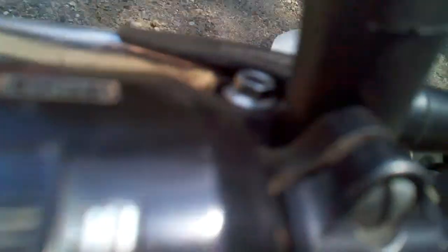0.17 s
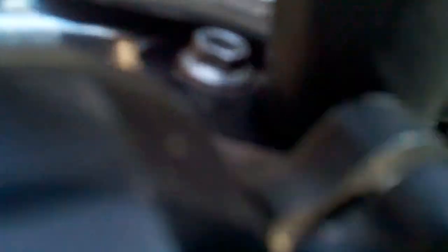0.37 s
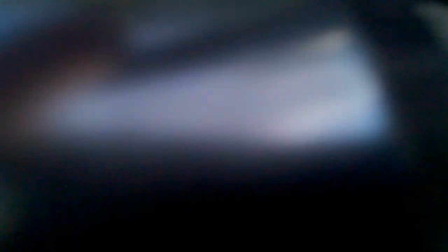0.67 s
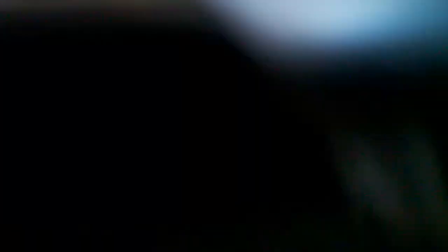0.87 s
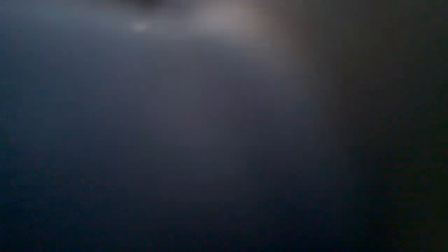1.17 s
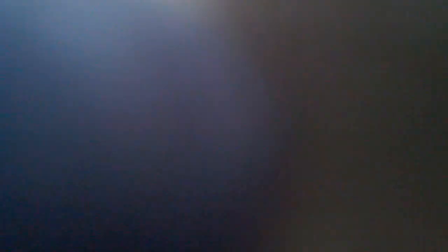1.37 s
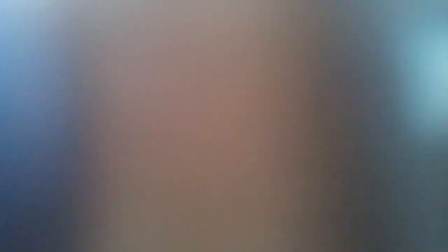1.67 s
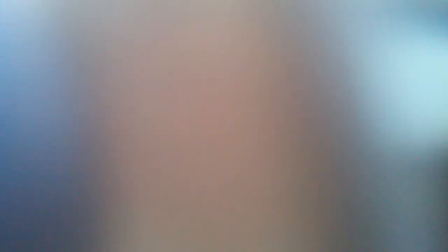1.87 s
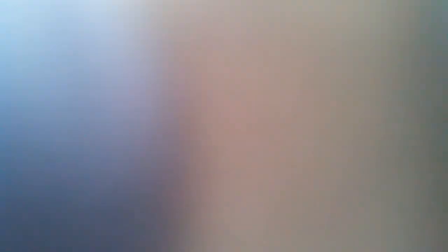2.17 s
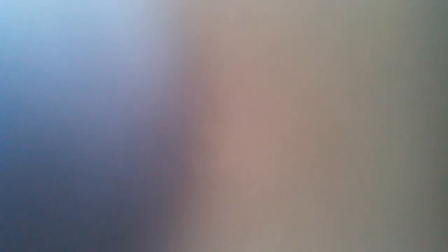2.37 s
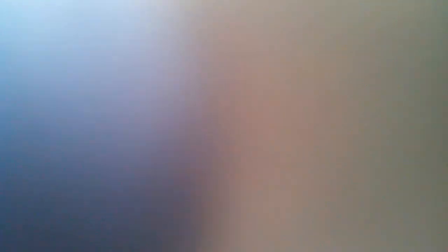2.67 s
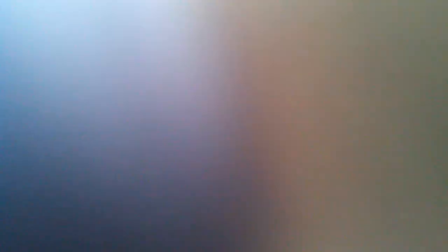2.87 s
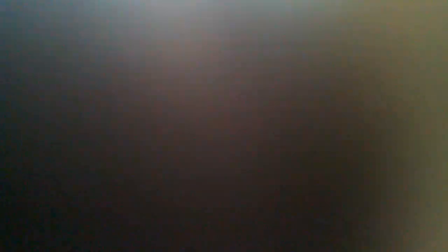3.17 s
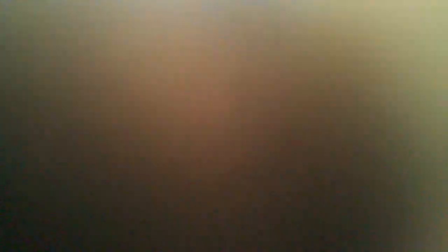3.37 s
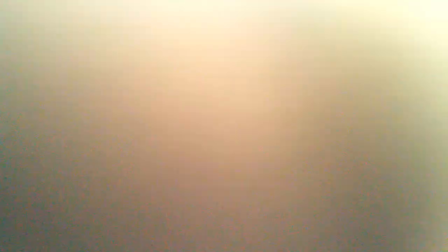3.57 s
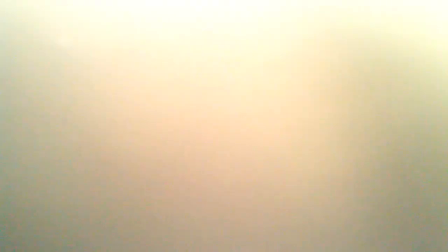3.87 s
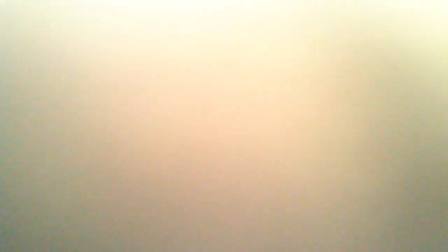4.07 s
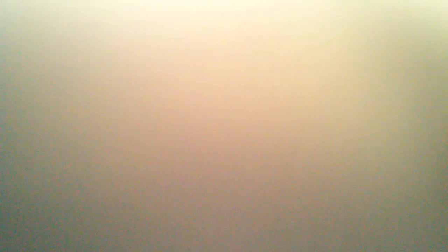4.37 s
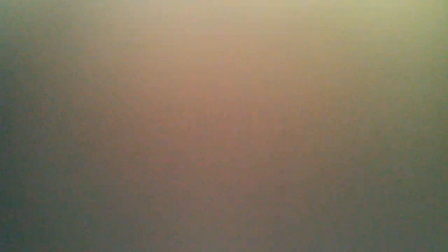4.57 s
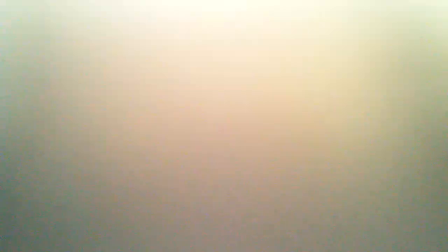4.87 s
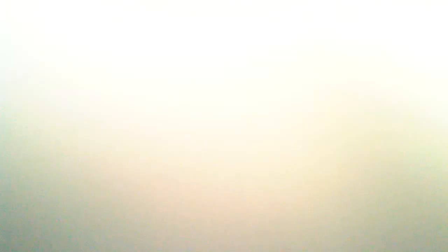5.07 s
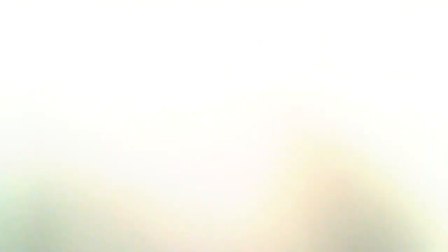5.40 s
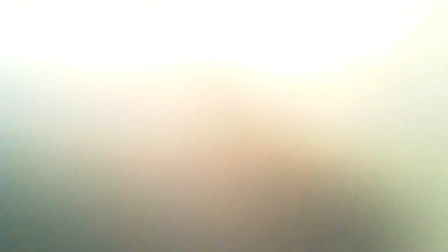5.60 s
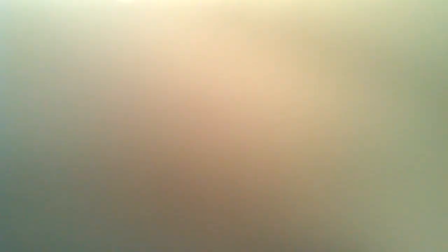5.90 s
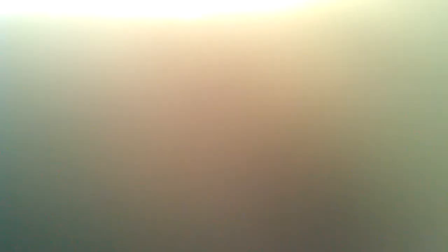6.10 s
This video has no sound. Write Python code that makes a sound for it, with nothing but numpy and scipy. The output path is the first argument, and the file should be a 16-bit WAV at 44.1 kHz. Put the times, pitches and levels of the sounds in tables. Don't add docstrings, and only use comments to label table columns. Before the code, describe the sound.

A small two-stroke motorbike idles lumpily with uneven pops and ticking, blips its throttle, stutters into a pull-away, then runs steadily as wind rises.

```python
import sys
import numpy as np
from scipy import signal
from scipy.fft import rfft, irfft
from scipy.io import wavfile

SR = 44100
rng = np.random.default_rng(int(sys.argv[2]) if len(sys.argv) > 2 else 0)


def file_out(sig):
    cols = np.atleast_2d(sig).T
    lim = np.clip(cols, -1, 1)
    pcm = np.round(lim * 32767).astype(np.int16)
    wavfile.write(sys.argv[1], SR, pcm)


def volts_from_db(level):
    exponent = np.asarray(level, float) / 20
    return 10 ** exponent


N = 275184


def rms_one(x):
    return x / np.sqrt(np.mean(x ** 2) + 1e-20)


def in_time(rows, s=None):
    t, *columns = np.transpose(rows)
    when = np.arange(N) / SR if s is None else s
    return [np.interp(when, t, c) for c in columns]


def clicks(s, size):
    at = np.round(np.asarray(s) * SR).astype(int)
    inside = (at >= 0) & (at < N)
    return np.bincount(at[inside], np.asarray(size)[inside], N) + 1e-18


def resonate(x, hz, width_hz):
    r = np.exp(-np.pi * width_hz / SR)
    poles = [1, -2 * r * np.cos(2 * np.pi * hz / SR), r * r]
    return signal.lfilter(np.array([1, 0, -1]) * (1 - r * r) / 2, poles, x)


def resonate_twice(x, hz, width_hz):
    return resonate(resonate(x, hz, width_hz), hz, width_hz)


def ring(x, modes):
    return sum((-1) ** k * volts_from_db(db) * resonate(x, hz, w) for k, (hz, w, db) in enumerate(modes))


def butter(x, order, hz, kind="low"):
    return signal.sosfilt(signal.butter(order, hz, kind, fs=SR, output="sos"), x)


def smear(x, seconds):
    r = np.exp(-1 / (seconds * SR))
    return signal.lfilter([np.e / (seconds * SR)], [1, -2 * r, r * r], x)


def drift(rate_hz):
    return rms_one(smear(rng.standard_normal(N + SR), 1 / (2 * np.pi * rate_hz))[SR:])


def colour(x, spectrum):
    hz, level_db = np.transpose(spectrum)
    f = np.fft.rfftfreq(N, 1 / SR) + 1
    gain = volts_from_db(np.interp(np.log(f), np.log(hz), level_db))
    return rms_one(irfft(rfft(x) * gain, N))


# t/s, blast/dB, hiss/dB
THROTTLE_FIRINGS = [(2.7598, -1, -26.5), (2.8127, -1, -28.5), (2.8389, -2, -30), (2.856, -1, -30),
                    (2.872, -3, -35), (3.4386, 3.5, -56), (3.4903, 4.5, -20.5), (3.5851, 3.5, -18.5),
                    (3.652, 2.5, -21), (3.7112, 1.5, -27), (3.7499, 3.5, -23), (3.791, -0.5, -42),
                    (3.832, 3.5, -24.5), (3.8723, 3, -22), (3.914, -0.5, -31.5), (3.9602, 3, -22.5),
                    (4.005, 3, -25.5), (4.0559, 1.5, -27), (4.1044, 2.5, -27), (4.1538, 1.5, -29),
                    (4.201, 2.5, -26)]
# t/s, blast/dB
IDLE_FIRINGS = [(-0.0064, 6.5), (0.1444, -11.5), (0.2241, -6.5), (0.3442, -11), (0.4289, -5.5),
                (0.508, -14.5), (0.5975, -3.5), (0.753, -9.5), (0.839, -4), (0.962, -18), (1.0069, -2),
                (1.252, -2), (1.4515, -6), (1.6415, -4), (1.8001, -2.5), (1.947, -7), (2.0285, -11),
                (2.1047, -5.5), (2.186, -13), (2.2716, -4.5), (2.309, -17), (2.4086, -3), (2.636, -3.5),
                (2.73, -12.5)]


def firings():
    lead_s, spurt_db, spurt_per_blast_db = .0015, -24.5, 3.5
    idle = [(s - lead_s, db, spurt_db + spurt_per_blast_db * db) for s, db in IDLE_FIRINGS]
    return np.transpose([*idle, *THROTTLE_FIRINGS])


# t/s, turns per s
CRANK_SPEED = [(0, 26), (.98, 24), (1.05, 29), (1.4, 30), (1.6, 26), (2.58, 22), (2.7, 31), (2.86, 55),
               (2.93, 56), (3.12, 49), (3.35, 41.5), (3.43, 39.5), (4.26, 41.64), (4.38, 44.16),
               (4.6, 44.77), (4.7, 42.98), (5.75, 44.55), (5.9, 43.56), (5.98, 40.98), (6.1, 42.88)]


def overspeed():
    idle_turns_per_s, cruise_db = 25, 4
    speed_db = 20 * np.log10(in_time(CRANK_SPEED)[0] / idle_turns_per_s)
    return speed_db, np.maximum(speed_db - cruise_db, 0)


# t/s, ordinary puff/dB, pipe heat/0-1
ENGINE_LOAD = [
    (0, -21, 0.43),
    (2.68, -20.5, 0.33),
    (2.82, -14, 0.52),
    (2.92, -11.5, 0.62),
    (3.36, -11, 0.75),
    (3.46, -9, 0.41),
    (4.2, -11.5, 0.67),
    (4.27, -2, 0.72),
    (6.24, -3, 0.84),
]


def turns():
    fire_s, blast_db, _ = firings()
    s = np.arange(N) / SR
    angle = np.cumsum(in_time(CRANK_SPEED)[0]) / SR
    at_fire = np.interp(fire_s, s, angle)
    fired = np.r_[0, np.cumsum(np.maximum(np.round(np.diff(at_fire)), 1))].astype(int)
    rest = int(angle[-1] - at_fire[-1])
    count = [*fired, fired[-1] + rest]
    turn_angle = np.interp(np.arange(count[-1] + 1), count, [*at_fire, at_fire[-1] + rest])
    at = np.interp(turn_angle, angle, s)
    puff_db, heat = in_time(ENGINE_LOAD, at)
    cold_uneven_db, hot_uneven_db = 2, .75
    uneven_db = cold_uneven_db + (hot_uneven_db - cold_uneven_db) * heat
    uneven_db = uneven_db * (1 - .8 * in_time(OVERRUN, at)[0])
    wobble = uneven_db[:, None] * rng.standard_normal((len(at), 2))
    level_db = puff_db + wobble[:, 0]
    at = at + .00013 * wobble[:, 1]
    at[fired], level_db[fired] = fire_s, blast_db
    return at, level_db, heat


# f/Hz, width/Hz, level/dB
COOL_PIPE = [(306.9, 35.9, 11), (397, 51.4, 6), (271.6, 2, -4.5), (140, 500, -18.5), (663, 54.5, -2)]
# f/Hz, width/Hz, level/dB
HOT_PIPE = [(147.6, 89, -14), (209.5, 89, -12.5), (378, 48.1, 3), (480, 36, -4), (594, 920, -19.5),
            (551, 36, -16), (308.5, 26, -1)]


def silencer(at, size, heat, ratio):
    echo_s, echo_share = 0.00679, 0.57
    cut_s, cut_share = 0.01271, 0.14
    swell_s, swell_share = 0.00289, 0.33
    cool, hot = (1 - heat) * size, heat * size
    cool_puffs = clicks(at, cool) + clicks(at + echo_s / ratio, echo_share * cool)
    cool_puffs = cool_puffs - clicks(at + cut_s / ratio, cut_share * cool)
    hot_puffs = clicks(at + 0.001882 / ratio, hot) + clicks(at + (0.0016 - swell_s) / ratio, swell_share * hot)
    stretch = np.array([ratio, ratio, 1])
    return ring(cool_puffs, COOL_PIPE * stretch) + volts_from_db(4.0) * ring(hot_puffs, HOT_PIPE * stretch)


# t/s, share/0-1
OVERRUN = [
    (2.87, 0),
    (2.9, 0.7),
    (3.14, 0.68),
    (3.3, 0.65),
    (3.42, 0.49),
    (3.5, 0.13),
    (4.2, 0.15),
    (4.3, 0.35),
    (4.8, 0),
    (6.24, 0.02),
]


def exhaust(at, level_db, heat):
    soft = in_time(OVERRUN, at)[0]
    breath_lag_s, breath_db, pull_away_s = 0.0019, 9.5, 3.4
    breaths = clicks(at + breath_lag_s, soft * volts_from_db(level_db + breath_db))
    level_db = level_db + 20 * np.log10(1.001 - soft)
    hard = np.isin(at, np.transpose(THROTTLE_FIRINGS)[0]) & (at > pull_away_s)
    sucks = clicks(at + 0.019, (1 - heat) * volts_from_db(-28.0 + rng.normal(0, 6.5, len(at))))
    modes = silencer(at, ~hard * volts_from_db(level_db), heat, 0.98) + ring(sucks, COOL_PIPE)
    warm_db, warm_heat, warm_ratio = -1.5, 0.39, 1.069
    warm = silencer(at, hard * volts_from_db(level_db + warm_db), warm_heat, warm_ratio)
    modes = modes + warm - 0.87 * resonate(warm, 491, 108)
    modes = modes + resonate_twice(breaths, 340, 73)
    modes = modes + ring(breaths, [(192, 450, -23), (430, 24, -13), (600, 49, -26), (231, 38, -14)])
    modes = butter(modes, 4, [124, 560], "band")
    crankcase_beat = volts_from_db(15) * resonate_twice(breaths, 113.4, 38.5)
    return crankcase_beat - volts_from_db(41.5) * butter(modes, 4, 950)


# f/Hz, width/Hz, level/dB
RASP_MODES = [(640, 40, -3), (1054, 27, -32), (1246, 82, 6.5), (1860, 130, -22), (2200, 160, 7)]


def rasp(at, level_db, heat):
    rasp_db, shut_share, shut_turns = -6.5, 0.57, 0.44
    size = heat ** 2 * volts_from_db(rasp_db + .6 * level_db + rng.normal(0, 1.5, (2, len(at))))
    opening = clicks(at + 0.0032, size[0])
    shutting = clicks(at + .004 + shut_turns * np.gradient(at), shut_share * size[1])
    return volts_from_db(13.0) * butter(ring(opening + shutting, RASP_MODES), 4, 480, "high")


# t/s, level/dB
INTAKE_HONK = [
    (2.66, -56),
    (2.7, -19),
    (2.76, -9.5),
    (2.82, -14.5),
    (2.88, -58),
    (2.95, -63),
]


def intake(at):
    gulps = clicks(at - .006, volts_from_db(in_time(INTAKE_HONK, at)[0] + 49.0))
    return resonate(gulps, 220, 47) - .5 * resonate(gulps, 277, 88)


# t/s, peak/dB
IDLE_SLAPS = [(0.0507, -36), (0.094, -25), (0.1321, -19), (0.178, -42), (0.2171, -23), (0.292, -27),
              (0.333, -21), (0.375, -22.5), (0.418, -23), (0.5, -25), (0.5396, -21), (0.5873, -22),
              (0.6998, -35), (0.743, -28.5), (0.7828, -29), (0.825, -26), (0.9043, -29), (0.9466, -27),
              (0.9953, -23), (1.058, -34), (1.095, -35), (1.162, -45), (1.1992, -36), (1.249, -15),
              (1.3334, -38), (1.367, -36), (1.4, -35.5), (1.44, -33), (1.509, -34), (1.546, -30.5),
              (1.5856, -37), (1.6386, -26), (1.7048, -31), (1.7436, -31), (1.788, -23), (1.857, -26.5),
              (1.895, -29), (1.9343, -28), (2.014, -18), (2.0504, -33), (2.091, -32), (2.1719, -28),
              (2.204, -36), (2.258, -26), (2.3313, -31), (2.3555, -34), (2.398, -25), (2.4457, -17),
              (2.4909, -31), (2.539, -38), (2.5826, -32), (2.624, -12), (2.689, -42)]


def slaps(knock_s):
    mean_db, top_db, unheard_db, reach_s = -42, 15, 6, .012
    tick_s, tick_db = np.transpose(IDLE_SLAPS)
    nearest = np.abs(knock_s[:, None] - tick_s).argmin(axis=1)
    heard = np.abs(knock_s - tick_s[nearest]) < reach_s
    own_db = np.minimum(tick_db[nearest] - mean_db, top_db)
    slap_db = np.where(heard, own_db, unheard_db * (knock_s < tick_s[-1]))
    return np.where(heard, tick_s[nearest], knock_s), slap_db


# t/s, grip/0-1
HAND_GRIP = [
    (0, 0.0),
    (.4, 0.05),
    (.85, 0.07),
    (1.25, 0.5),
    (2.6, 0.57),
    (3.1, 0.45),
    (6.24, 0.9),
]


def knock(knock_s, slap_db, level_db):
    chance_db = rng.normal(0, 1.0, len(knock_s))
    strength = volts_from_db(0.043 * np.minimum(level_db + 43, 16) + 0.59 * slap_db + chance_db)
    raps = smear(clicks(knock_s, strength), 0.0028) * rng.standard_normal(N)
    raps = ring(raps, [(1934, 110, -3.5), (3540, 850, -8.5), (1280, 420, -3), (5250, 750, -13.5)])
    cold = 1 - in_time(ENGINE_LOAD, knock_s)[1]
    edges = clicks(knock_s, strength * in_time(HAND_GRIP, knock_s)[0] * cold)
    return volts_from_db(-2.5) * resonate(edges, 1800, 330) + volts_from_db(-27.0) * raps


# f/Hz, width/Hz, level/dB, gain hot/dB, gain rolling fast/dB
CASE_MODES = [(988, 16, 13.5, 0, -22), (1092.6, 38, 16, -3, -12), (1189, 16, 1, -6.5, 19),
              (1296.6, 11.5, 5.5, -7.5, 13.5), (1318, 18, -7, 6, 17), (1770, 22, -2, 1, 3),
              (1916, 14, -3, -8, 10), (1416, 13, -19, 19, -13), (747, 95, 2, 6, 0.5)]
# t/s, share of top speed/0-1, tyre and gas hiss/dB
ROLLING = [(0, 0, -3), (.4, 0.13, 4.5), (2.7, 0.23, -2), (4.3, 0.2, -1), (4.95, 0.17, -1.5),
           (5.25, 0.76, 1), (5.6, 1, -2.5), (5.9, 0.7, -1.5), (5.93, 0.2, -7), (6.05, 0, -4),
           (6.24, 1, -3.5)]


def clatter(knock_s, level_db):
    speed_db, flare_db = overspeed()
    clatter_db = -27 + 0.56 * speed_db + 1.47 * flare_db - 10.5 * in_time(HAND_GRIP)[0]
    heat, rolling = in_time(ENGINE_LOAD)[1], in_time(ROLLING)[0]
    rattle_per_s, hot_rattle_loss = 900, 0.45
    rattle = (rng.random(N) < rattle_per_s / SR) * rng.choice([-1, 1], N)
    rattle = rattle * volts_from_db(2.4 * np.minimum(rng.exponential(1, N), 3.5)) * (1 - hot_rattle_loss * heat)
    spreads_db = rng.normal(0, 3, (len(CASE_MODES), len(knock_s)))
    spreads_db = spreads_db * (1 - .8 * in_time(ENGINE_LOAD, knock_s)[1])
    out = 0
    for (hz, width_hz, db, hot_db, rolling_db), spread_db in zip(CASE_MODES, spreads_db):
        knocks = clicks(knock_s, volts_from_db(11.0 + 0.3 * (level_db + 21.5) + spread_db))
        mode_db = db + hot_db * heat + rolling_db * rolling
        out = out + volts_from_db(mode_db) * rms_one(resonate(rattle + knocks, hz, width_hz))
    return volts_from_db(clatter_db - 5.5) * rms_one(out)


# f/Hz, level/dB
ROAR_SPECTRUM = [(500, -5), (800, -2.5), (1250, 2), (1550, 1), (2000, 6), (2250, -1.5), (2450, -0.5),
                 (2900, -11.5), (3500, -12), (4500, -38)]
# f/Hz, level/dB
STRAIN_SPECTRUM = [(1500, -25), (2100, -5), (2550, 0), (2900, -1), (3150, -12), (4000, -22)]


def roar(knock_s):
    puff_db, heat = in_time(ENGINE_LOAD)
    roar_db = -48 + 6.5 * heat + 1.54 * overspeed()[1] + 6 * in_time(HAND_GRIP)[0]
    swells = smear(clicks(knock_s, volts_from_db(rng.normal(0, 1.3, len(knock_s)))), 0.003)
    throb = 1 + 2.0 * (1 - heat) * swells
    strain = colour(rng.standard_normal(N), STRAIN_SPECTRUM)
    strain = strain + .9 * resonate(strain, 2876, 16)
    strain = volts_from_db(1.4 * (puff_db - puff_db.max()) - 31 + 1.5 * drift(20)) * strain
    noise = colour(throb * rng.standard_normal(N), ROAR_SPECTRUM)
    return volts_from_db(roar_db + 5.0 + 1.18 * drift(15)) * noise + strain


def load_over_idle_db():
    return in_time(ENGINE_LOAD)[0] + 20.5


# f/Hz, level/dB
HISS_SPECTRUM = [(1500, 2.5), (3000, -18), (4000, -2.5), (5200, -4), (7600, 3), (9500, 0), (11500, -10.5),
                 (13500, -19.5), (16000, 0)]
# f/Hz, level/dB
SPURT_SPECTRUM = [(1500, 3), (2500, 11), (4000, 0.5), (5200, 0.5), (7600, 8), (9500, 3.5), (11500, 0),
                  (13500, -4), (16000, 7)]


def hiss(knock_s, slap_db):
    heat = in_time(ENGINE_LOAD)[1]
    hiss_db = -58.5 + 0.94 * load_over_idle_db() - 2 * heat + 2.13 * overspeed()[1]
    hiss_db = hiss_db + 10 * in_time(HAND_GRIP)[0] + in_time(ROLLING)[1]
    ticks = smear(clicks(knock_s, volts_from_db(slap_db + rng.normal(0, 1.0, len(knock_s)))), 0.0015)
    tick_depth = 0.077 + 0.99 * (1 - heat)
    steady = volts_from_db(hiss_db + 4.0 + 1.48 * drift(22)) * (1 + tick_depth * ticks)
    fire_s, _, spurt_db = firings()
    slow = np.interp(fire_s, knock_s, np.gradient(knock_s)) > .03
    spurts = 0
    for part, lead_s, width_s in [(slow, .011, .0035), (~slow, .004, .0016)]:
        puffs = clicks(fire_s - lead_s, part * volts_from_db(spurt_db + 1.0))
        spurts = spurts + smear(smear(puffs, width_s), width_s) / (width_s * SR)
    lag_s, ring_s = 0.001, 0.0048
    late = np.roll(smear(spurts, ring_s) / (np.e * ring_s * SR), int(lag_s * SR)) * volts_from_db(5.5)
    spurts = spurts + 0.16 * smear(spurts, 0.005) / (0.0094 * SR)
    parts = []
    for shape in [late, spurts, spurts]:
        flow = steady * colour(rng.standard_normal(N), HISS_SPECTRUM)
        burst = shape * volts_from_db(1.85 * drift(94)) * colour(rng.standard_normal(N), SPURT_SPECTRUM)
        parts.append(flow + burst)
    return parts


def thud(at):
    thud_db = -93 + 0.3 * load_over_idle_db()
    beats = clicks(at, volts_from_db(rng.normal(0, 1.5, len(at))))
    return volts_from_db(thud_db - 27) * rms_one(resonate_twice(beats, 63, 50))


# t/s, peak/dB
STONE_HITS = [
    (5.865, -10.5),
    (5.91, -18),
]


def stones():
    s, peak_db = np.transpose(STONE_HITS)
    hits = clicks(s, volts_from_db(peak_db + 27.0))
    return resonate(hits, 1540, 350) + 0.83 * resonate(hits, 790, 250) + 0.066 * resonate(hits, 3300, 980)


# f/Hz, level/dB
RUMBLE_SPECTRUM = [(25, -33), (55, -28), (85, -3.5), (115, 10.5), (160, 1), (300, 13.5), (470, -4.5),
                   (550, -1), (900, -29.5)]


def low_rumble():
    return volts_from_db(-30.5 - 17 * in_time(ENGINE_LOAD)[1]) * colour(rng.standard_normal(N), RUMBLE_SPECTRUM)


# f/Hz, level/dB
WIND_SPECTRUM = [(30, -40), (70, -24), (130, 5.5), (200, 3), (300, -1.5), (450, 2), (600, -23), (1000, -29)]
# t/s, level/dB
WIND_GUSTS = [
    (0, -61),
    (4.6, -45),
    (5.02, -39),
    (5.12, -31.5),
    (5.45, -28),
    (5.7, -29),
    (5.88, -23.5),
    (6.05, -25.5),
    (6.24, -28),
]


def wind_buffet():
    return volts_from_db(in_time(WIND_GUSTS)[0] + 5.2 * drift(25)) * colour(rng.standard_normal(N), WIND_SPECTRUM)


def scene():
    at, level_db, heat = turns()
    knock_lead_turns = .34
    knock_s, slap_db = slaps(at - knock_lead_turns * np.gradient(at))
    grip, = in_time(HAND_GRIP)
    pipe = exhaust(at, level_db, heat) + intake(at)
    pipe = .9 * np.tanh(pipe / .9)
    pipe = butter(pipe, 2, 70, "high")
    shared_hiss, stray_hiss, far_hiss = hiss(knock_s, slap_db)
    stray_hiss, far_hiss = volts_from_db(2.0) * butter([stray_hiss, far_hiss], 8, 4300, "high")
    machine = clatter(knock_s, level_db) + roar(knock_s) + knock(knock_s, slap_db, level_db)
    machine = machine + thud(at) + stones() + rasp(at, level_db, heat) + butter(shared_hiss, 4, 5600)
    rumble, wind = low_rumble(), wind_buffet()
    near = pipe + rumble + machine + stray_hiss + volts_from_db(0.5) * wind
    port_lag = 17
    open_db, shade_db, round_hand_db, rumble_shade_db = -6, 25, -16.5, 13
    far = volts_from_db(open_db - shade_db * grip) * np.roll(pipe, 8) - np.roll(machine + wind, port_lag)
    far = far + volts_from_db(round_hand_db) * grip * np.roll(pipe, 58)
    far = far + volts_from_db(-rumble_shade_db * grip) * rumble
    far = far + 0.06 * np.roll(stray_hiss, 2) + 0.62 * np.roll(stray_hiss, 150) + 0.84 * far_hiss
    tank_echo_s, tank_echo_share = .021, 0.26
    far = far + tank_echo_share * np.roll(machine, int(tank_echo_s * SR))
    return np.array([near, far])


def band_limit(x):
    return signal.sosfilt(signal.butter(12, 14350, fs=SR, output="sos"), x)


# f/Hz, width/Hz, share lost
SUM_DIPS = [(5200, 500, .55), (7800, 350, .35), (10450, 400, .4), (13000, 500, .55)]
# from f/Hz, to f/Hz
DIFFERENCE_GAPS = [(1230, 1400), (3650, 4150)]


def record(dry):
    dry = dry / (1 + (dry / .9) ** 6) ** (1 / 6)
    mid, side = (dry[0] + dry[1]) / 2, (dry[0] - dry[1]) / 2
    mid = signal.sosfiltfilt(signal.butter(2, [2440, 2800], "bandstop", fs=SR, output="sos"), mid)
    for gap_hz in DIFFERENCE_GAPS:
        side = signal.sosfiltfilt(signal.butter(2, gap_hz, "bandstop", fs=SR, output="sos"), side)
    mid = mid - sum(share * resonate(mid, hz, width_hz) for hz, width_hz, share in SUM_DIPS)
    top_cut = signal.cheby2(16, 60, 14350, fs=SR, output="sos")
    mix = signal.sosfilt(top_cut, [mid + side, mid - side])
    return band_limit(mix)


dry = scene()
out = record(dry)
file_out(out)
```